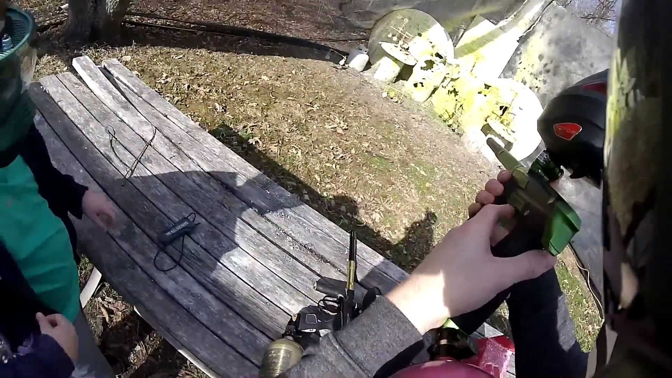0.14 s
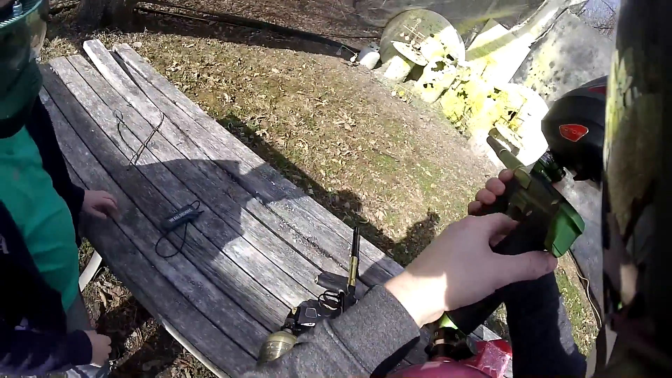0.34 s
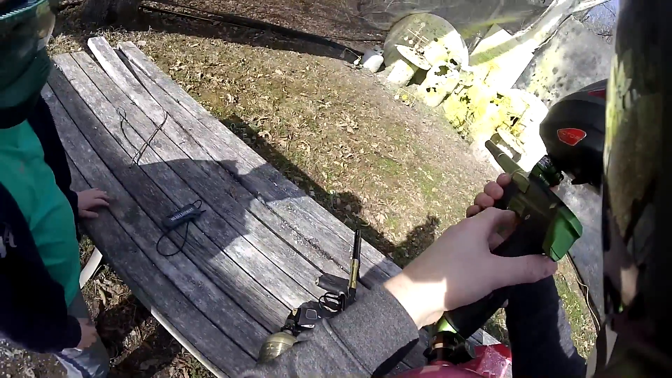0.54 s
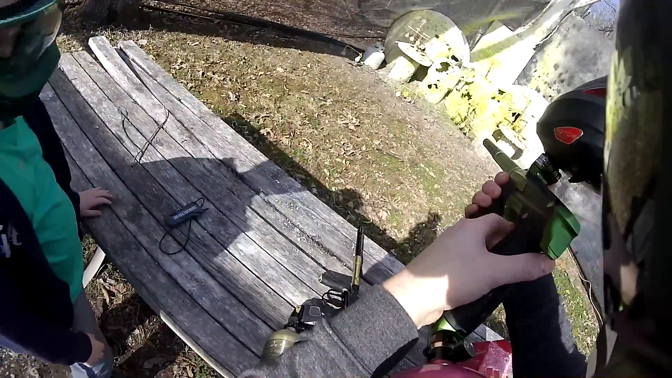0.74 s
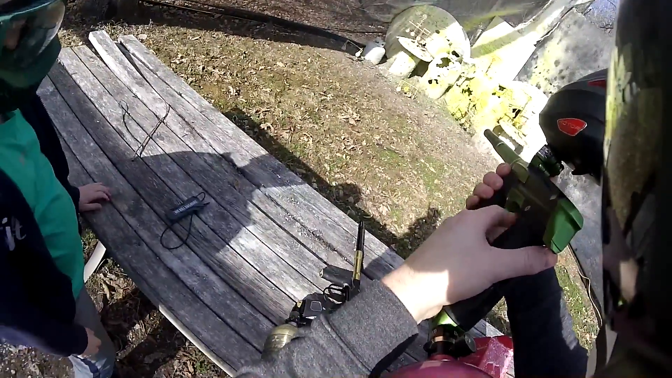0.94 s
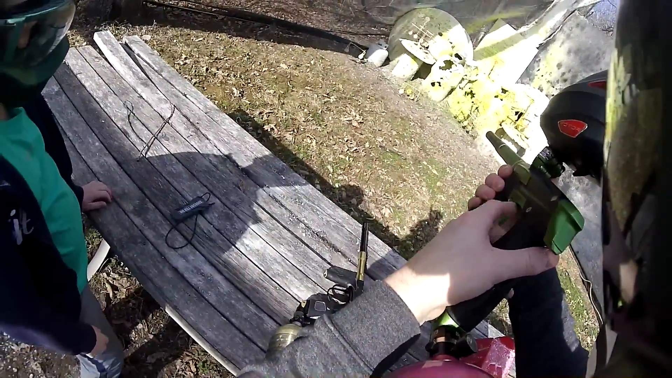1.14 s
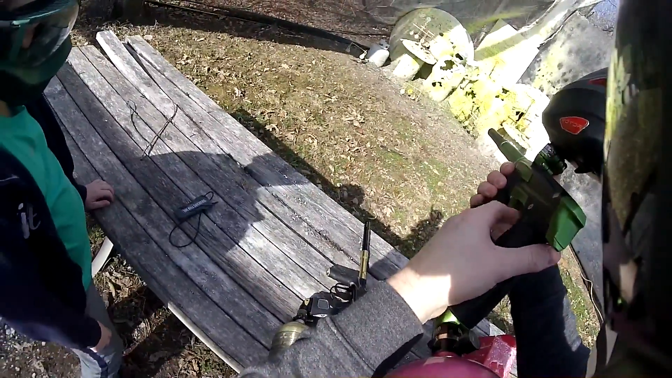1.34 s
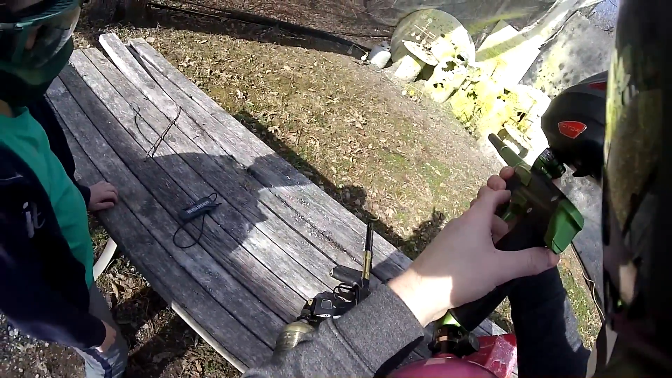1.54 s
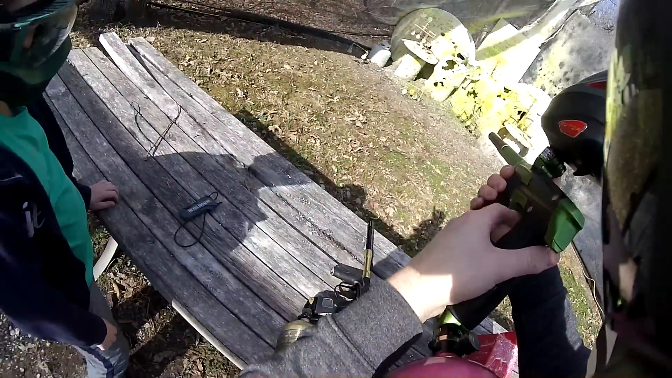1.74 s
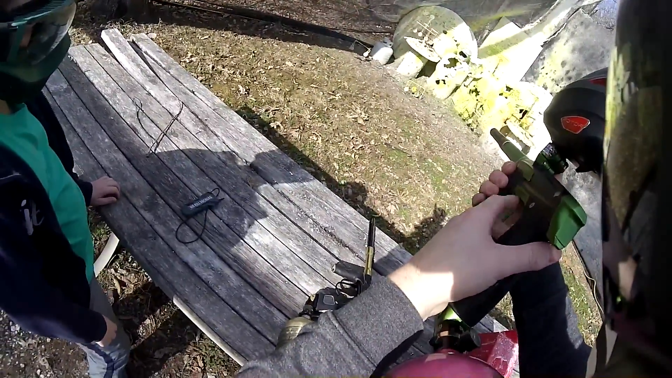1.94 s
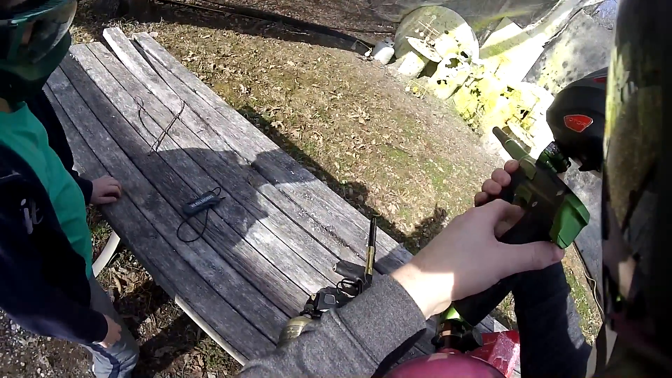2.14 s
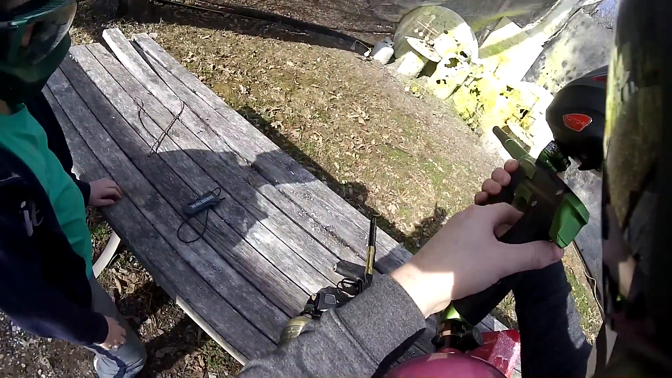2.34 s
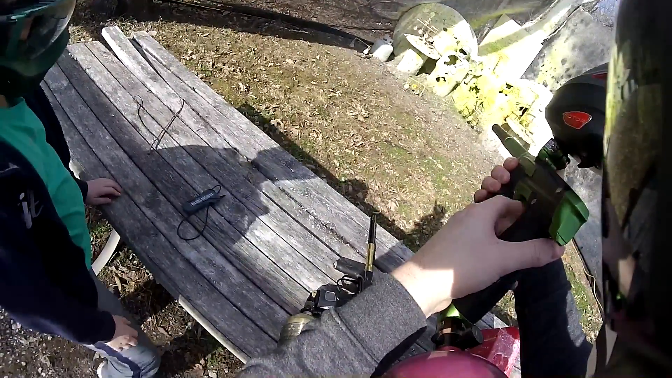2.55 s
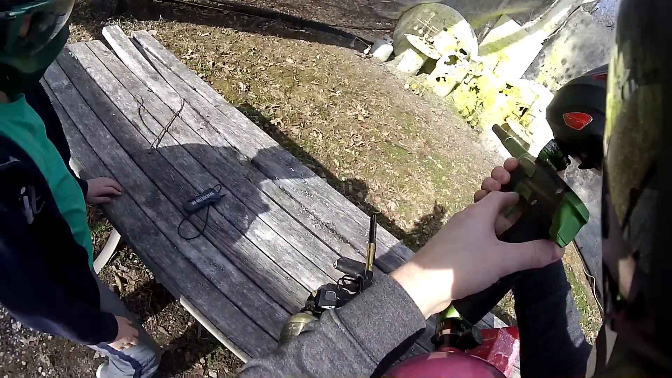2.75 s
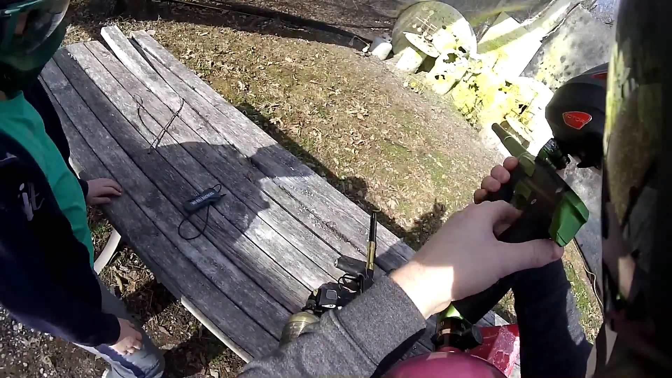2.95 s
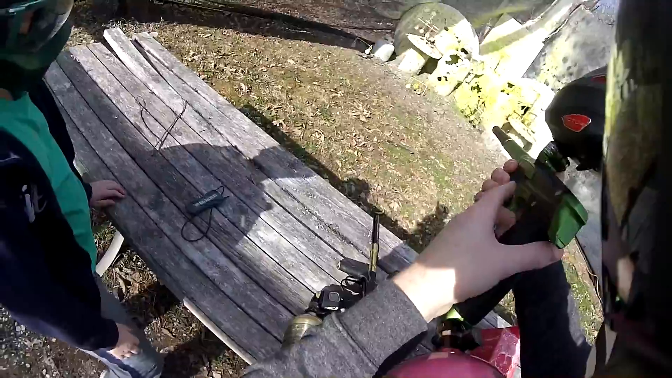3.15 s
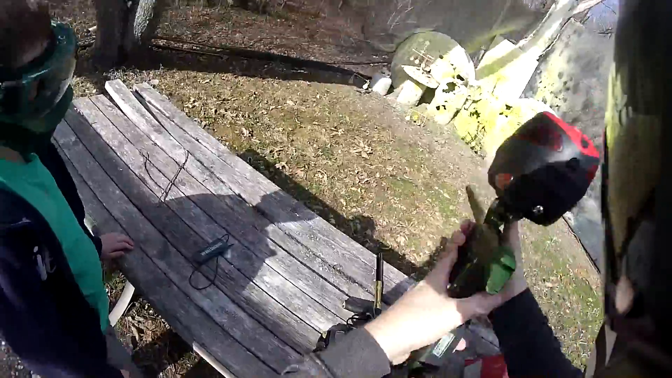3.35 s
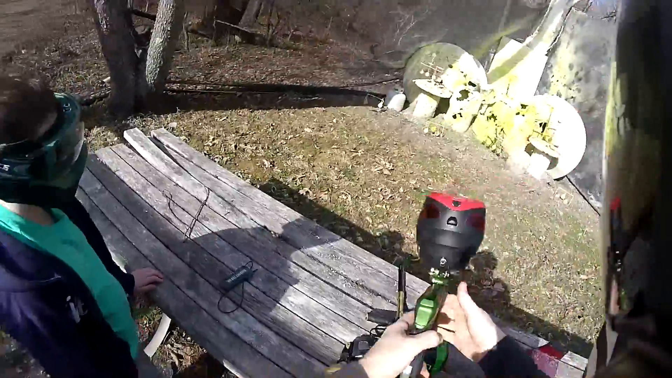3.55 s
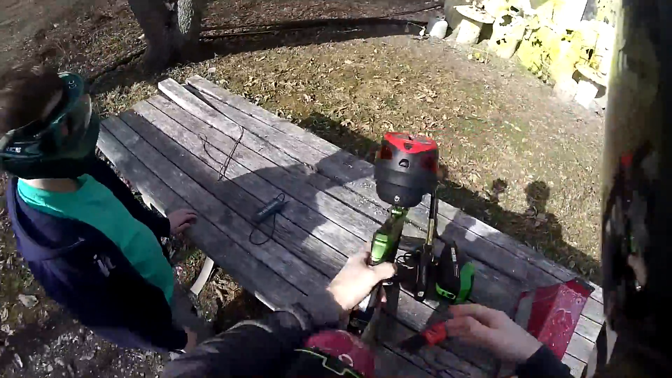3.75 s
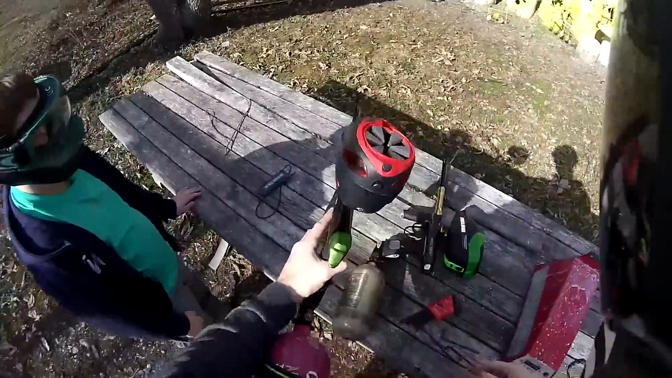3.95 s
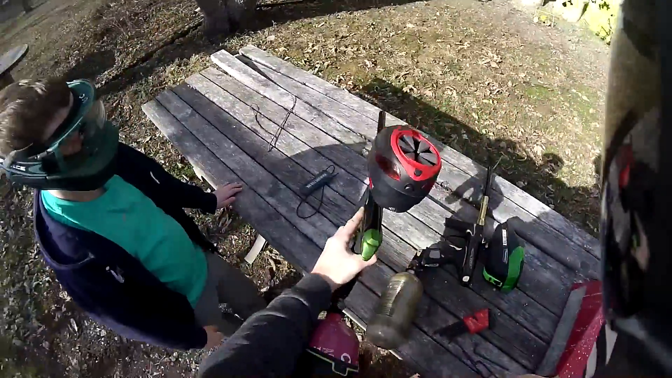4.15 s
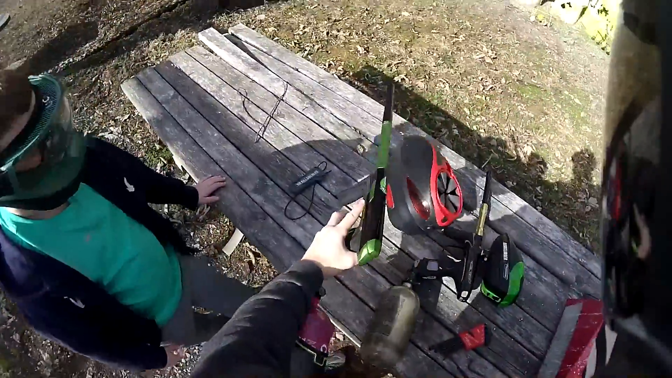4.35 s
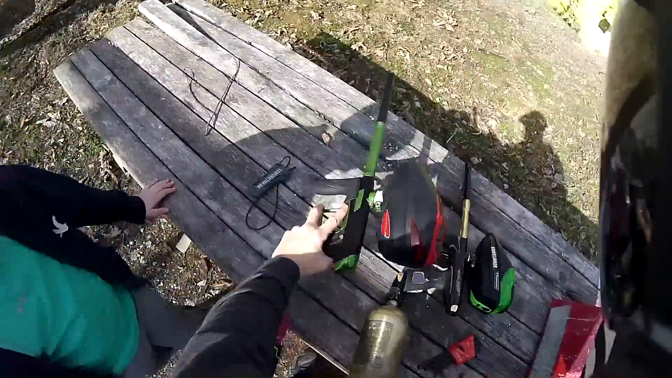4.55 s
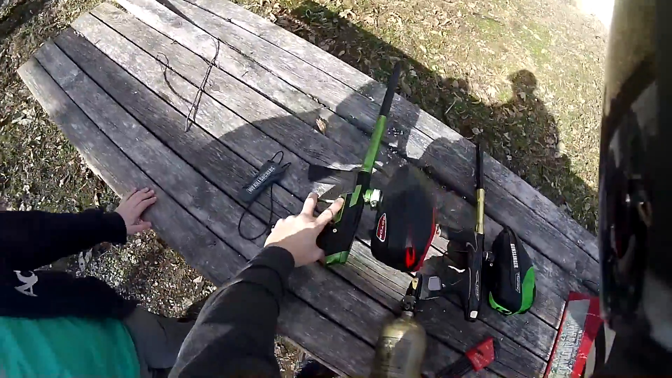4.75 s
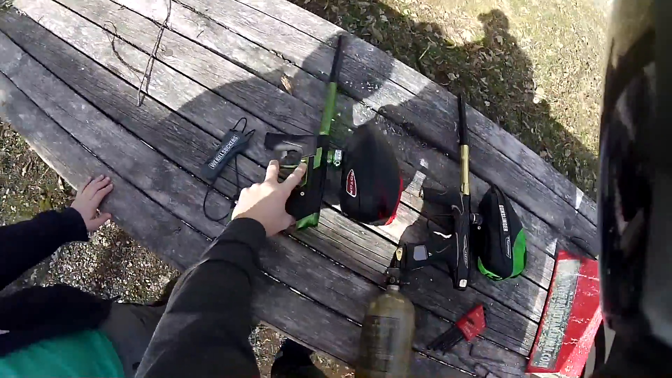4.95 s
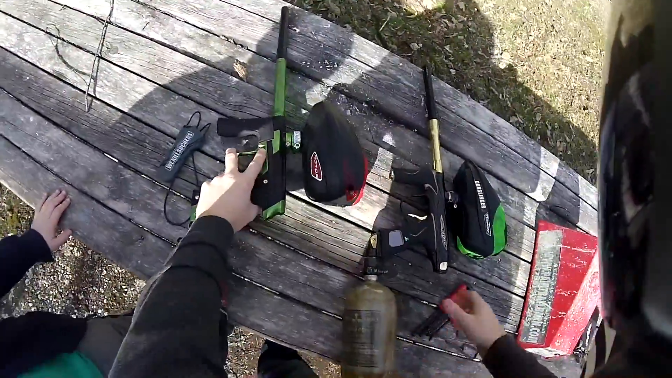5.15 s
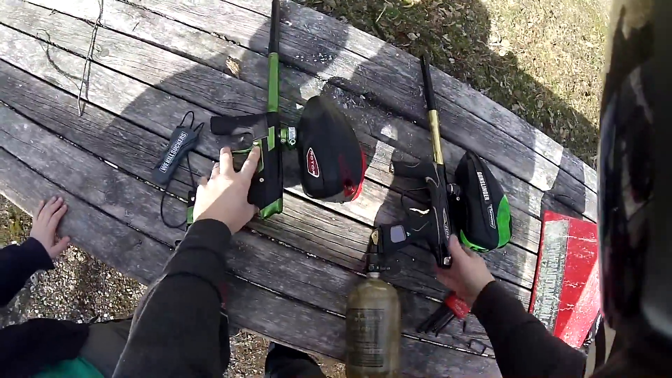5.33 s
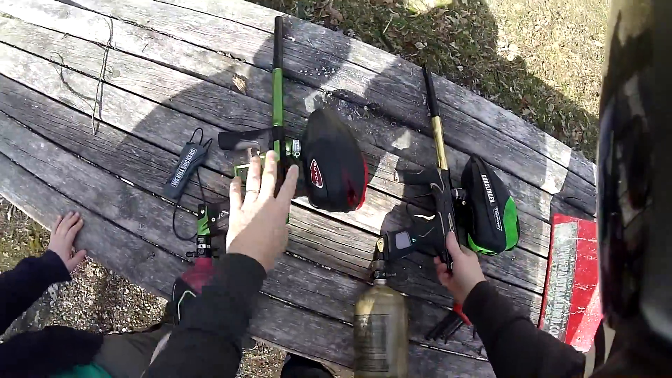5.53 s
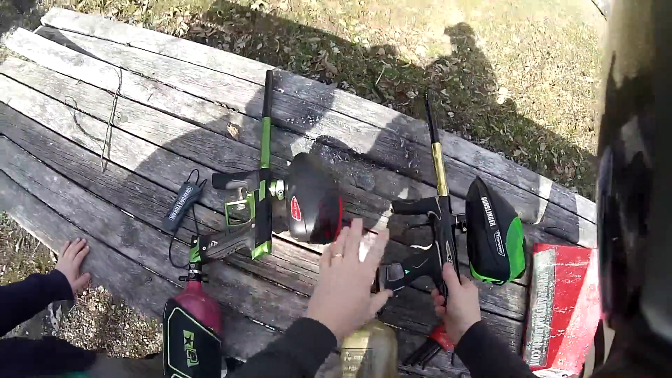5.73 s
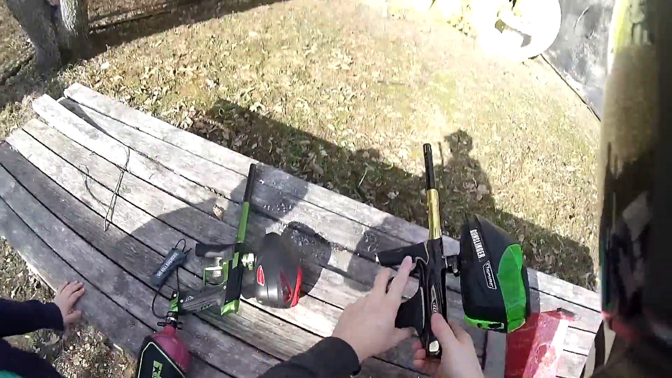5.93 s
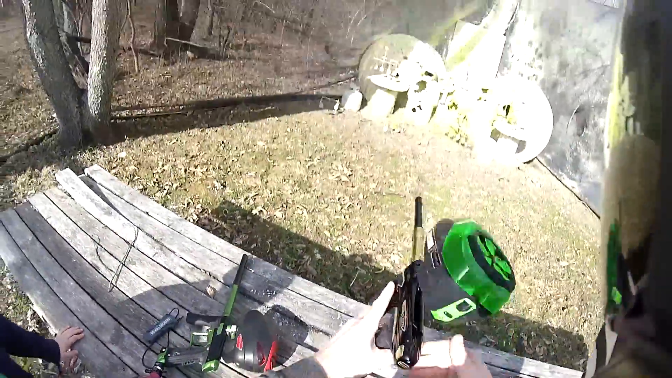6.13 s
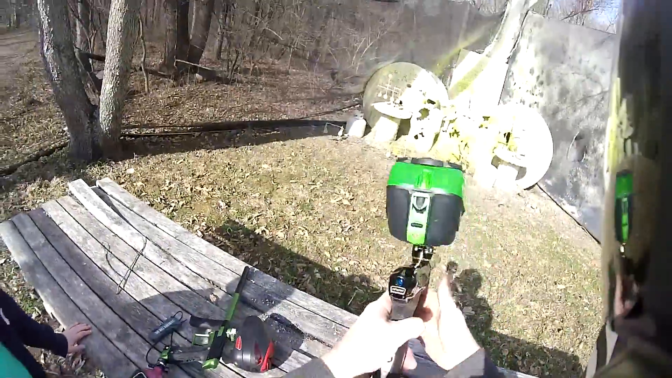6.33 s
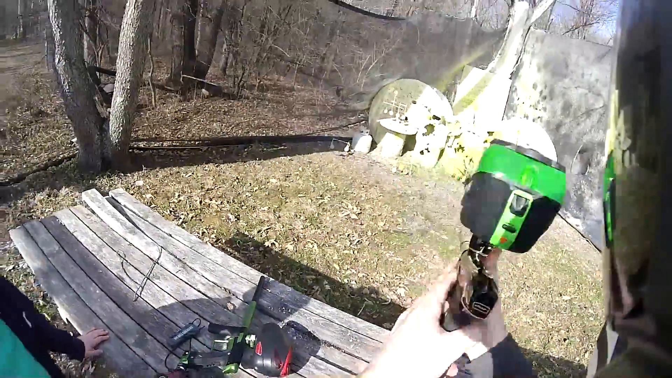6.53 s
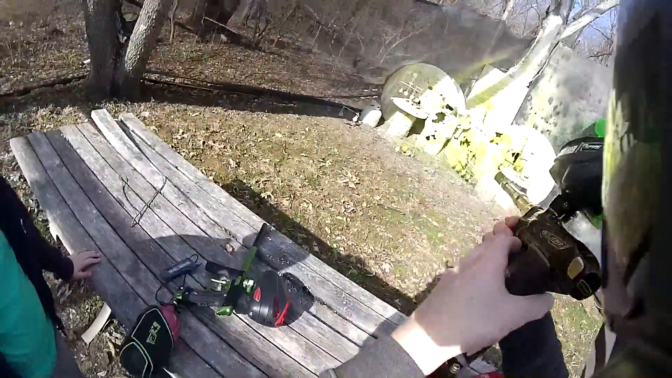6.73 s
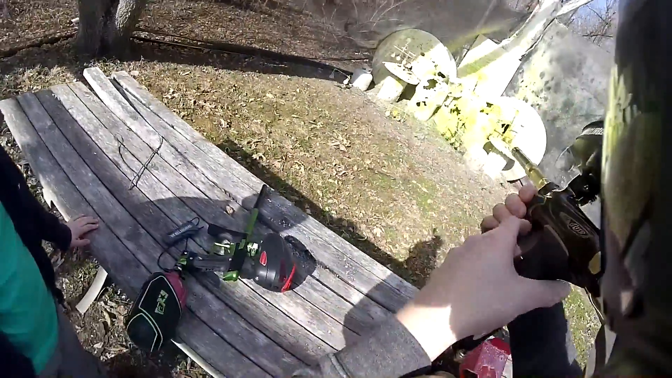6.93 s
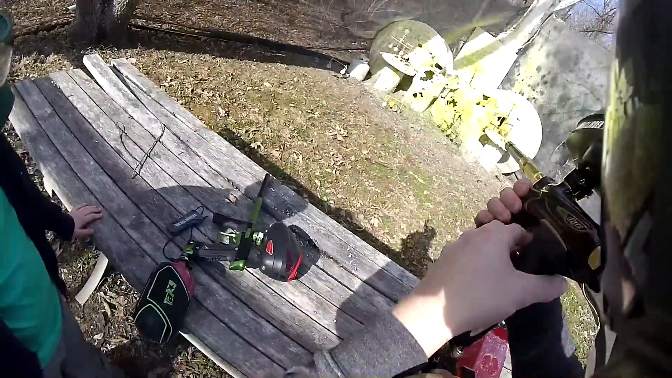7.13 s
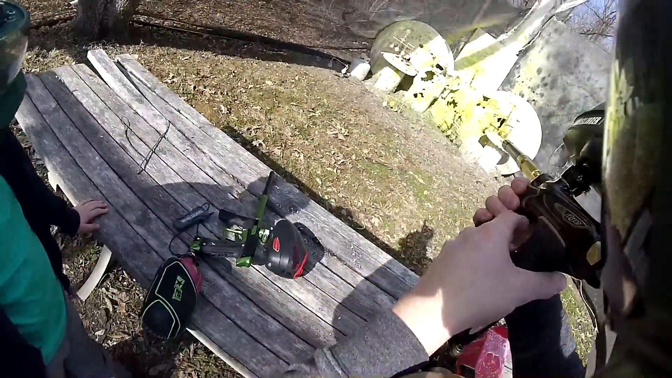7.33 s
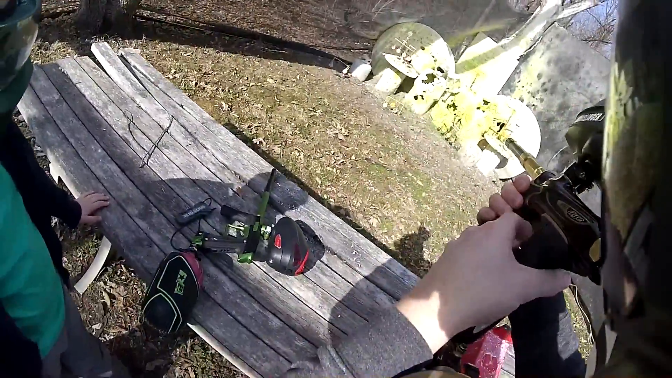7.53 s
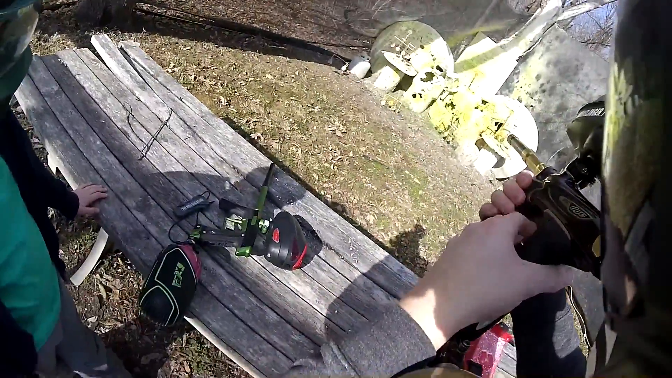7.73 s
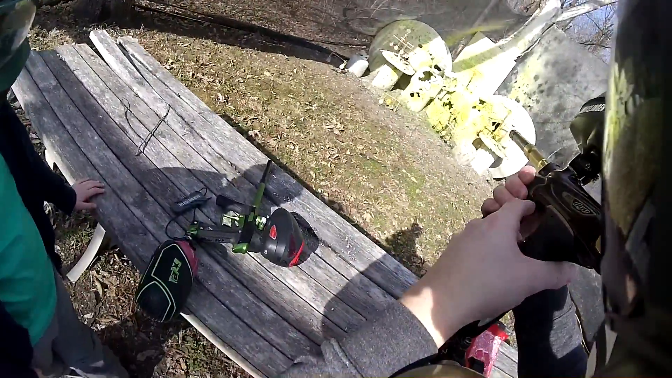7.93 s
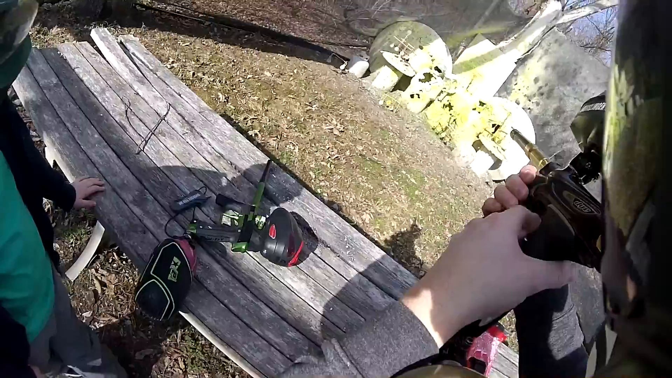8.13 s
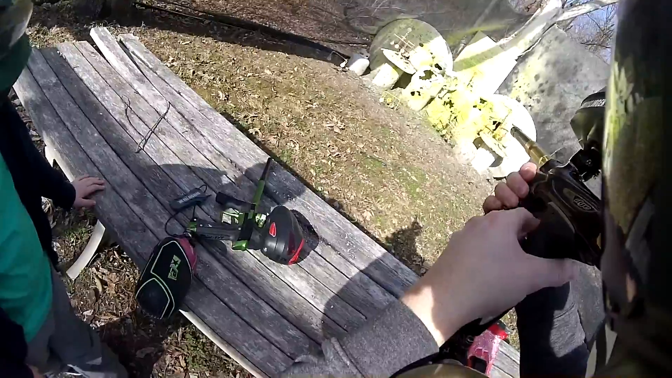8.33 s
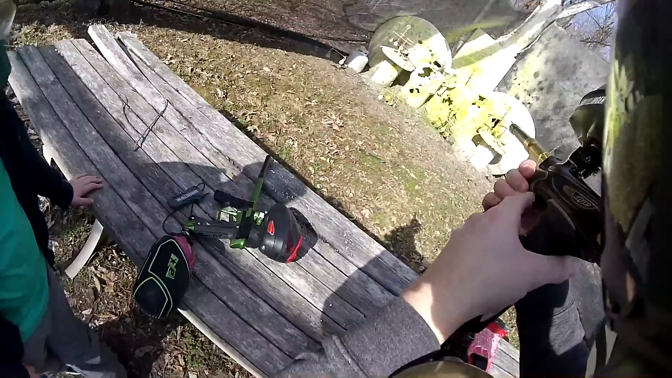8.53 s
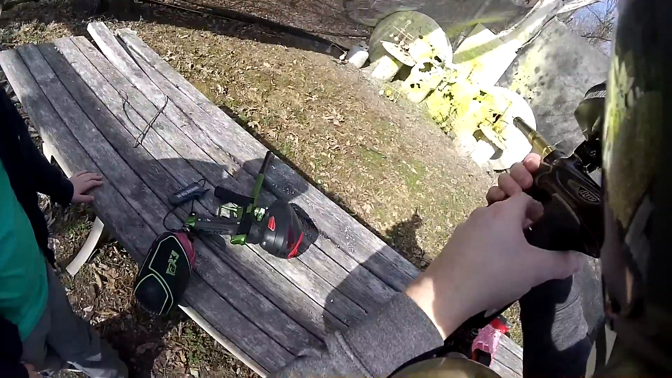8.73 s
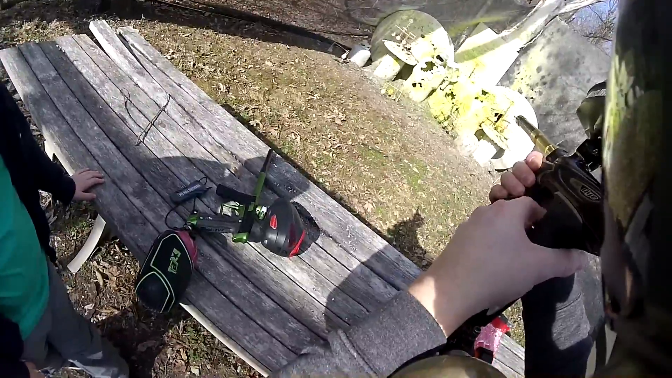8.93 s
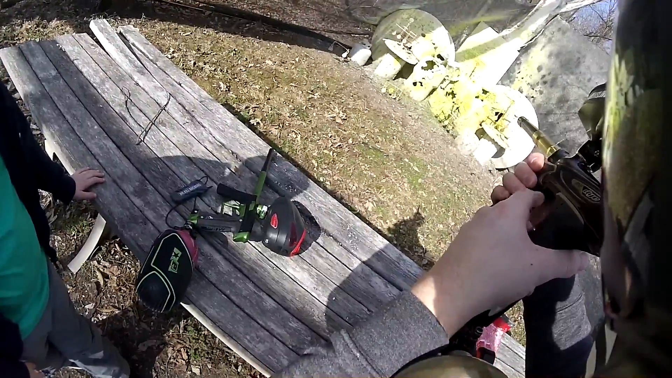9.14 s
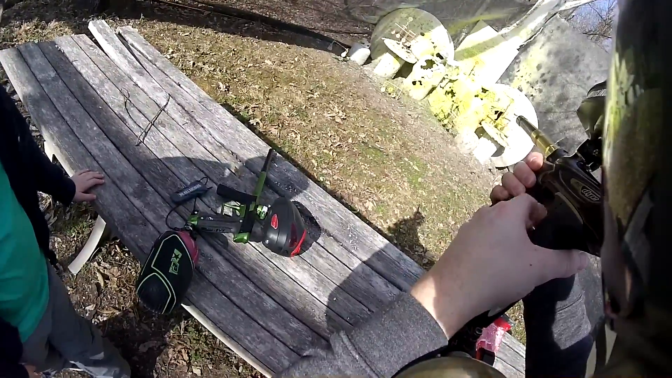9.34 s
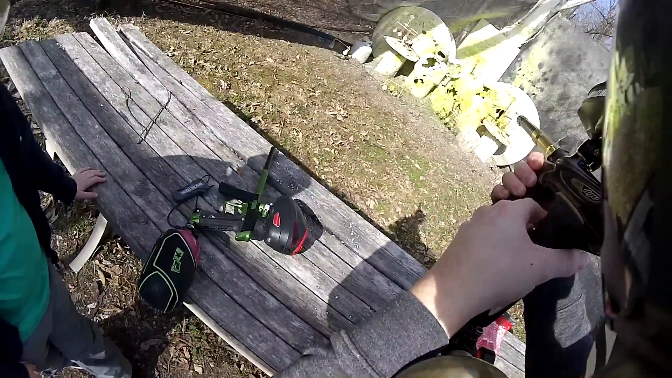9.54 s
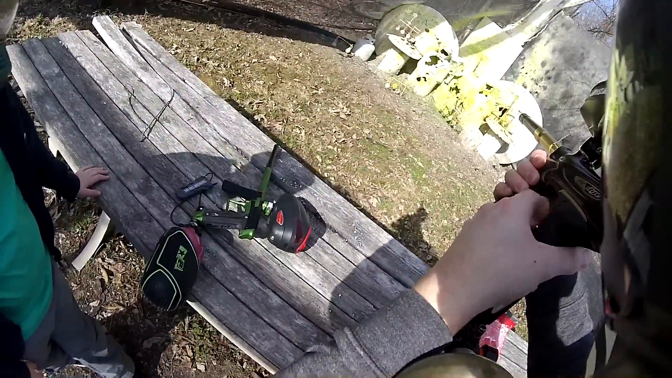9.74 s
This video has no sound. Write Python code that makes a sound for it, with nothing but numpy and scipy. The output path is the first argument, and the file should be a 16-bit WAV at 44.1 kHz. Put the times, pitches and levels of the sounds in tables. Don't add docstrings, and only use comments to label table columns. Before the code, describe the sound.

Open air with soft hiss and a far-off idling engine. Muffled close paintball shots come in two volleys, each shot a click, pop of gas and bolt clack, followed by a small splat a few metres away and a thin echo from trees. Between them, one marker is set down on a wooden table and another lifted, balls rolling in its hopper. The second volley cuts off mid-fire.

```python
import sys
import numpy as np
from scipy import signal
from scipy.fft import rfft, irfft
from scipy.io import wavfile

SR = 44100
rng = np.random.default_rng(int(sys.argv[2]) if len(sys.argv) > 2 else 0)


def int16_out(signal):
    q = np.round(np.clip(np.atleast_2d(signal).T, -1, 1) * 32767)
    wavfile.write(sys.argv[1], SR, q.astype(np.int16))


def magnitude_from_level(level_db):
    exponent = np.asarray(level_db, float) / 20
    return 10 ** exponent


N = 431298

# t/s of the bolt at the breech, flight of the ball/ms, target thud level/dB, slap level/dB
FIRST_VOLLEY = [(0.3506, 75.4, -18.5, -17), (0.4514, 75, -14, -15), (0.625, 71, -13.5, -15.5),
                (0.865, 76, -31, -18), (0.946, 75.4, -30, -22.5), (1.0266, 74, -34, -21.5),
                (1.1102, 78, -22.5, -25), (1.1918, 75, -26, -21.5), (1.2741, 77, -27, -22.5),
                (1.3542, 78, -36, -28), (1.9112, 74, -31, -29), (2.0511, 74, -22, -25),
                (2.1337, 76, -33, -25), (2.2155, 72, -33, -26.5), (2.2965, 71, -32, -24),
                (2.3786, 74, -24, -25.5), (2.4616, 74.7, -28, -21.5), (2.5419, 76, -32, -22),
                (2.6252, 76, -25.5, -25), (2.706, 72, -25.5, -24), (2.7872, 78, -32, -26.5),
                (2.905, 74, -27, -22), (2.9857, 78, -33, -25), (3.0713, 75.5, -33, -25.5)]
# t/s of the ball at the muzzle, shot level/dB, flight of the ball/ms, target slap level/dB
SECOND_VOLLEY = [(7.1348, -3, 75.6, -26.5), (7.4261, -2.5, 84, -25.5), (7.572, -2.6, 77, -30),
                 (7.7187, -1, 85, -28.5), (7.8735, -1.8, 73, -31), (7.9534, -2.5, 81, -36),
                 (8.0331, -1.5, 76, -24.5), (8.1142, -2.5, 91, -41), (8.194, -2.5, 98, -35),
                 (8.3134, -2, 73, -26.5), (8.3963, -2.8, 77, -38), (8.4761, -1.5, 96, -40),
                 (8.6133, -2, 73, -35), (8.7013, -2.5, 72, -37), (8.7812, -1.5, 77, -22.5),
                 (8.8616, -4, 59, -43), (8.941, -2, 99.7, -56), (9.0673, -4, 76.6, -29),
                 (9.1538, -3, 73, -27.5), (9.2336, -3, 87, -28.5), (9.3168, -4, 74, -28),
                 (9.3983, -2, 100, -53), (9.478, -2, 95, -42), (9.5585, -2, 98, -46),
                 (9.638, -1.7, 77, -40), (9.718, -1.5, 130, -60)]


def rms_one(x):
    return x / np.sqrt(np.mean(x ** 2) + 1e-20)


def band(x, low_hz, high_hz):
    return signal.sosfilt(signal.butter(2, [low_hz, high_hz], "band", fs=SR, output="sos"), x)


def drift(rate_hz):
    knots = rng.standard_normal(int(N / SR * 40) + 2)
    return np.interp(np.arange(N) / SR * rate_hz, np.arange(len(knots)), knots)


def clicks(seconds, gains):
    train = np.full(N, 1e-18)
    places = np.clip(np.round(seconds * SR).astype(int), 0, N - 1)
    np.add.at(train, places, gains)
    return train


def fade(train, t60):
    return signal.lfilter([1], [1, -magnitude_from_level(-60 / (t60 * SR))], train)


def ring(train, hz, t60):
    r = magnitude_from_level(-60 / (t60 * SR))
    w = 2 * np.pi * hz / SR
    return signal.lfilter([0, np.sin(w)], [1, -2 * r * np.cos(w), r * r], train)


def splash(train, white, low_hz, high_hz, t60):
    to_rms_one = np.sqrt(SR / 2 / (high_hz - low_hz))
    return band(white * fade(train, t60), low_hz, high_hz) * to_rms_one


def level(rows):
    s, db = np.transpose(rows)
    return magnitude_from_level(np.interp(np.arange(N) / SR, s, db, left=-120, right=-120))


def engine():
    # multiple of the firing rate, level/dB
    harmonics = [(2, -7), (3, -14), (4, -5.5), (5, 3), (6, -6), (7, -4.5), (8, -9), (9, -11), (10, -8),
                 (13, -37), (14, -18), (16, -18.5), (17, -6.5), (19, -9), (20, -10.5), (21, -17.5)]
    firing_s, first_firing_s = .049737, .0255
    turn = 2 * np.pi * (np.arange(N) / SR - first_firing_s) / firing_s
    thump = sum(-magnitude_from_level(db) * np.cos(k * turn) for k, db in harmonics)
    flicker_db = .8 * drift(10.0)
    return magnitude_from_level(-61.5 + flicker_db) * rms_one(thump)


def air():
    # f/Hz, level/dB per Hz
    spectrum = [(30, -10), (60, -9), (200, -18), (400, -14), (620, -19), (1150, -11.5), (1600, -15.5),
                (2600, -22), (3500, -33.5), (6000, -36), (12600, -38.5), (13300, -62)]
    hz, db = np.transpose(spectrum)
    bin_hz = np.arange(N // 2 + 1) * SR / N
    colour = magnitude_from_level(np.interp(np.log(bin_hz + 1), np.log(hz), db))
    wash = rms_one(irfft(rfft(rng.standard_normal(N)) * colour, N))
    whine = np.sin(2 * np.pi * 9625 * np.arange(N) / SR)
    swell_db = .6 * drift(2.9) + .8 * drift(22)
    return magnitude_from_level(-60 + swell_db) * wash + magnitude_from_level(-86.5) * whine


def marker(at, level_db, cycle, rings, puffs, spread_db, stick_ms):
    shots = len(at)
    when = {}
    for moment, (after_ms, spread_ms) in cycle.items():
        when[moment] = at + (after_ms + spread_ms * rng.standard_normal(shots)) / 1000
    when["solenoid"] = when["solenoid"] - stick_ms * .6 ** np.arange(shots) / 1000
    out, white = np.zeros(N), rng.standard_normal(N)
    for hz, db, t60_ms, rise_ms, moment in rings:
        vary_db = spread_db * rng.standard_normal(shots)
        train = clicks(when[moment], magnitude_from_level(level_db + db + vary_db))
        t60, rise = t60_ms / 1000, rise_ms / 1000
        fast = 1 / (1 / t60 + 1 / (rise * np.log(1000)))
        out += ring(train, hz, t60) - ring(train, hz, fast)
    for low_hz, high_hz, db, t60_ms, moment in puffs:
        vary_db = 1.11 * spread_db * rng.standard_normal(shots)
        train = clicks(when[moment], magnitude_from_level(level_db + db + vary_db))
        out += splash(train, white, low_hz, high_hz, t60_ms / 1000)
    return out


def first_marker():
    # t/ms after the shot, timing spread/ms
    first_cycle = dict(solenoid=(-18.7, .3), bolt=(-.2, .15), pop=(4.7, .2), slide=(23.4, .05),
                   back=(29.3, .05), rebound=(32.0, .05))
    # f/Hz, level/dB, t60/ms, rise/ms, moment
    first_rings = [(958, -11, 9.2, 4.3, "solenoid"), (1414, -21, 19.6, 1.1, "bolt"),
                   (268, -28, 22, 0.36, "bolt"), (647, -19.5, 6.7, 0.59, "pop"),
                   (374, -15.5, 13.6, 0.45, "pop"), (239, -24.5, 39, 1.3, "pop"),
                   (126, -20.5, 37.7, 2.6, "pop"), (8600, -7.5, 7.7, 0.59, "pop"),
                   (395.4, -21.5, 51, 4.2, "slide"), (1130, -16.5, 9.8, 0.59, "back"),
                   (496, -20, 13.4, 0.58, "rebound"), (1004, -16.5, 8.9, 0.63, "rebound"),
                   (1197, -41, 210, 1.7, "rebound"), (3510, -49.5, 9.8, 0.37, "pop")]
    # low f/Hz, high f/Hz, level/dB, t60/ms, moment
    first_puffs = [(700, 1500, -35, 40, "bolt"), (4400, 7700, -35, 72, "bolt"),
                   (1150, 3800, -23.5, 13, "pop"), (4600, 9900, -20.5, 12.4, "pop"),
                   (870, 3600, -36, 45, "slide"), (4400, 15000, -34.5, 42, "slide"),
                   (1540, 4100, -31, 23, "back"), (294, 1130, -37, 32, "back"),
                   (2400, 4330, -41.5, 33, "pop"), (4800, 7200, -31, 18, "back"),
                   (245, 1510, -43, 360, "pop")]
    at = np.transpose(FIRST_VOLLEY)[0]
    return marker(at, 0.79, first_cycle, first_rings, first_puffs, spread_db=1.2, stick_ms=0)


def blows(at, thud_db, slap_db, crack_db, modes, noise_db, noise_t60, fizz_db, deep_db, deep_hz):
    out, white = np.zeros(N), rng.standard_normal(N)
    at = at + .0007
    for hz, db, t60 in modes:
        strength_db = thud_db if hz < 620 else slap_db if hz < 1800 else crack_db
        vary = rng.standard_normal(len(at))
        gains = magnitude_from_level(strength_db + db + 2.0 * vary) * np.sign(vary)
        out += ring(clicks(at, gains), hz, t60)
    ranges = [(deep_hz, 620, thud_db + deep_db), (600, 1800, slap_db),
              (1800, 4000, crack_db), (4000, 11000, crack_db + fizz_db)]
    for low_hz, high_hz, db in ranges:
        shorter = (1000 / high_hz) ** .6
        out += splash(clicks(at, magnitude_from_level(db + noise_db)), white, low_hz, high_hz, noise_t60 * shorter)
    return out


def hits():
    shell_crack_db = [-17, -21, -25, -22.5, -17.5, -24, -26, -24.5, -24, -26.5, -25.5, -30, -27, -28, -30,
                      -28, -21.5, -20.5, -23, -29, -21.5, -27, -20.5, -23]
    at, flight_ms, thud_db, slap_db = np.transpose(FIRST_VOLLEY)
    first = [at + flight_ms / 1000, thud_db, slap_db, shell_crack_db]
    at, shot_db, flight_ms, slap_db = np.transpose(SECOND_VOLLEY[:-1])
    far_ms = flight_ms - 78
    thud_db = slap_db - 2.5 - 0.67 * far_ms
    crack_db = slap_db - 2 + 0.73 * far_ms
    second = [at + flight_ms / 1000, thud_db, slap_db, crack_db]
    return np.hstack([first, second])


def bursts():
    # f/Hz, level/dB, t60/s
    target_modes = [(292.4, -3, 0.048), (357, -17, 0.073), (592, -7.5, 0.045), (970, -16, 0.054),
                    (1320, -10, 0.03), (1499, -11, 0.04), (2120, -4.5, 0.018), (2790, -5, 0.008),
                    (3530, -1.5, 0.0027)]
    return blows(*hits(), target_modes, noise_db=-5.5, noise_t60=0.079, fizz_db=5.5, deep_db=-4, deep_hz=198)


def woods():
    at, thud_db, slap_db, crack_db = hits()
    echoes = clicks(at + 0.0062, magnitude_from_level(slap_db - 23.5))
    return splash(echoes, rng.standard_normal(N), 900, 2480, 0.23)


def whir():
    # t/s, f/Hz, level/dB
    whistle = [
        (0.734, 474, -54),
        (.765, 520, -48),
        (.8, 515, -47),
        (.815, 486, -54),
    ]
    s, hz, db = np.transpose(whistle)
    pitch_hz = np.interp(np.arange(N) / SR, s, hz)
    return level(np.c_[s, db]) * np.sin(2 * np.pi * np.cumsum(pitch_hz) / SR)


def grip_ticks():
    # t/s, level/dB
    touches = [
        (4.056, -39.5),
        (4.101, -44),
        (4.176, -36.5),
        (4.204, -49),
        (4.238, -47),
        (4.412, -44.5),
    ]
    # f/Hz, level/dB, t60/s
    grip_modes = [(1300, 0.5, 0.022), (1600, 3.5, 0.015), (2130, 1.5, 0.019), (3100, -24, .02)]
    at, db = np.transpose(touches)
    return blows(at, db - 17, db, db - 2.5, grip_modes,
                 noise_db=-15, noise_t60=0.13, fizz_db=-22, deep_db=1, deep_hz=330)


def scrape():
    # t/s, level/dB
    drag = [
        (4.6, -74),
        (4.81, -67),
        (4.826, -51),
        (4.894, -54),
        (4.92, -71),
    ]
    return level(drag) * magnitude_from_level(4.4 * drift(35)) * rms_one(band(rng.standard_normal(N), 45, 330))


def plank_knocks():
    # t/s, thud level/dB, slap level/dB
    laid = [(4.824, -57, -46.5), (4.844, -67, -46.5), (4.869, -54, -62), (4.89, -63, -45.5),
            (5.007, -33, -37), (5.054, -38, -44), (5.105, -55, -49), (5.224, -43, -42.5),
            (5.235, -35.5, -43), (5.268, -48, -53), (5.725, -60, -60)]
    # t/s, thud level/dB, slap level/dB
    lifted = [(6.235, -53, -51), (6.378, -51, -35), (6.433, -63, -32.5), (6.464, -29, -31.5),
              (6.498, -66, -43), (6.539, -57, -55), (6.565, -61, -56), (6.787, -56, -64), (7.047, -68, -60),
              (7.324, -43.5, -42), (8.243, -61, -44)]
    # f/Hz, level/dB, t60/s
    plank_modes = [(120, -12, 0.05), (396, -8.5, 0.041), (552, -3, 0.064), (694, -5, 0.054),
                   (920, -8, 0.051), (1260, -8, 0.035), (1600, -6, 0.012), (2240, 8, 0.011),
                   (3150, -5, 0.02)]
    knocks = [(s, thud, slap, slap - 14) for s, thud, slap in laid]
    knocks += [(s, thud, slap, slap - 17) for s, thud, slap in lifted]
    wood = blows(*np.transpose(knocks), plank_modes,
                 noise_db=-8.0, noise_t60=0.12, fizz_db=-17, deep_db=-6.5, deep_hz=400)
    return band(wood, 300, 9000)


def rolling():
    # t/s, level/dB
    loose = [
        (6.386, -36.5),
        (6.79, -56),
        (7.048, -52.5),
    ]
    s, db = np.transpose(loose)
    drops = fade(clicks(s, magnitude_from_level(db)), 0.12)
    tip_s = 6.498
    before_s = tip_s - np.arange(N) / SR
    gather = magnitude_from_level(-74 * np.abs(before_s)) * (before_s > 0)
    heap = magnitude_from_level(-60 * np.abs(before_s) / 0.051)
    settle = fade(clicks(np.array([tip_s]), 1), 0.43)
    surge = clicks(np.transpose(SECOND_VOLLEY)[0] + 0.004, magnitude_from_level(-43.5))
    feed = fade(surge, 0.78) - fade(surge, 0.023 * np.log(1000))
    return magnitude_from_level(-38) * (gather + settle) + magnitude_from_level(-34) * heap + drops + feed


def hopper(per_s, rush_db):
    # f/Hz, level/dB, t60/s
    hopper_modes = [(550, -1.5, 0.023), (635, 1, 0.0033), (1010, 4.5, 0.011), (1024, -6, 0.03),
                    (1220, -6, 0.019), (1290, -8, 0.0049), (1690, -17.5, 0.009), (2130, -7.5, 0.0056),
                    (2880, -19, 0.0073)]
    born = rng.random(N) < per_s * magnitude_from_level(4.0 * drift(25)) / SR
    sizes = magnitude_from_level(3.0 * np.minimum(rng.exponential(1, N), 4)) * rng.choice([-1, 1], N)
    dealt = rng.integers(0, len(hopper_modes), N)
    knocks = np.zeros(N)
    for k, (hz, db, t60) in enumerate(hopper_modes):
        knocks += ring(magnitude_from_level(db) * sizes * born * (dealt == k) + 1e-18, hz, t60)
    rush = rms_one(band(rng.standard_normal(N), 390, 2160))
    balls = rms_one(knocks) + magnitude_from_level(rush_db) * rush
    return rolling() * band(band(balls, 440, 4900), 400, 9000)


def second_marker():
    # t/ms after the shot, timing spread/ms
    second_cycle = dict(solenoid=(-15.6, .3), bolt=(-9.5, .5), gas=(-2.1, .02), pop=(.15, .02),
                    echo=(2.15, .03), late=(7.4, .05), back=(20.5, .4), feed=(27.5, .6))
    # f/Hz, level/dB, t60/ms, rise/ms, moment
    second_rings = [(1220, -14.5, 6, 0.22, "solenoid"), (491.5, -6.5, 38, 2.2, "gas"),
                    (110.6, -24, 68, 2.8, "gas"), (836, -6, 26.1, 1.93, "gas"),
                    (1133, 1.5, 1.92, 0.13, "pop"), (2106, -16, 5.7, 0.1, "pop"),
                    (866, -13, 17.4, 0.18, "echo"), (1470, -17.5, 8.5, 0.065, "echo"),
                    (6430, -3, 5.5, 0.32, "echo"), (323.5, -18, 33.4, 1.87, "late"),
                    (1050, -17.5, 1.2, 0.098, "echo"), (8720, -16, 7.6, .3, "echo"),
                    (239, -25.5, 14, 1.2, "solenoid"), (499.5, -18.5, 51.5, 1.1, "late")]
    # low f/Hz, high f/Hz, level/dB, t60/ms, moment
    second_puffs = [(1500, 4900, -64, 15.0, "solenoid"), (4000, 7900, -40, 29, "solenoid"),
                    (650, 2000, -32.5, 52, "bolt"), (1140, 2530, -19, 18.3, "pop"),
                    (4200, 8000, -18.5, 9, "pop"), (4300, 17800, -18.5, 29.5, "echo"),
                    (600, 1330, -30.5, 25, "back"), (600, 3600, -37, 32, "feed"),
                    (4060, 15000, -30.5, 10, "feed"), (4030, 9600, -39.5, 12.0, "back"),
                    (506, 3800, -33, 88, "echo"), (3580, 7000, -45, 200, "echo")]
    at, shot_db = np.transpose(SECOND_VOLLEY)[:2]
    return marker(at, shot_db, second_cycle, second_rings, second_puffs, spread_db=1.1, stick_ms=3.5)


def pipe_glance():
    # t/s, thud level/dB, slap level/dB, crack level/dB
    strays = [
        (8.212, -43, -40, -32),
    ]
    # f/Hz, level/dB, t60/s
    pipe_modes = [(2330, -16, .03), (3080, -2, 0.1), (4640, -5, 0.05)]
    at, *ranges_db = np.transpose(strays)
    return magnitude_from_level(-4.0) * blows(at - .001, *ranges_db, pipe_modes,
                             noise_db=-14, noise_t60=0.057, fizz_db=3.0, deep_db=-3, deep_hz=200)


def housing(x):
    dull = signal.sosfilt(signal.butter(4, 3160, fs=SR, output="sos"), x)
    heard = band(dull + magnitude_from_level(-21) * x, 84, 9250)
    return signal.sosfilt(signal.butter(4, 10500, fs=SR, output="sos"), heard)


def scene():
    background = engine() + air() + woods()
    near = first_marker() + bursts() + whir()
    near += grip_ticks() + scrape() + plank_knocks()
    near += hopper(per_s=1100.0, rush_db=-13)
    near += second_marker() + pipe_glance()
    return (housing(near) + background)[None]


def top_cut(x):
    return signal.sosfilt(signal.butter(12, 14070, fs=SR, output="sos"), x)


def record(dry):
    return top_cut(dry)


dry = scene()
out = record(dry)
int16_out(out)
```